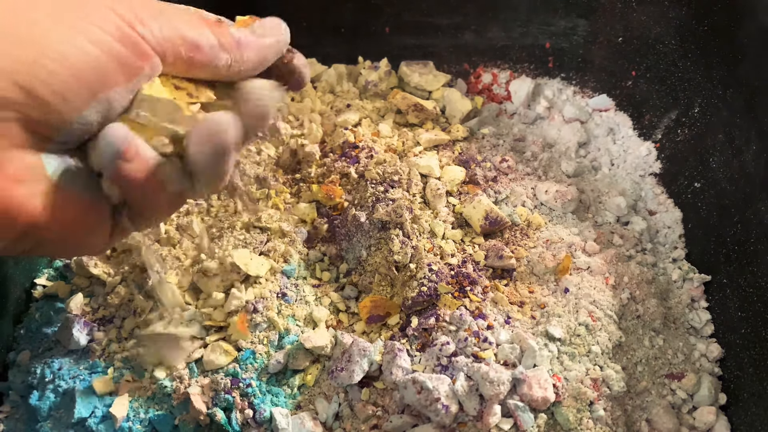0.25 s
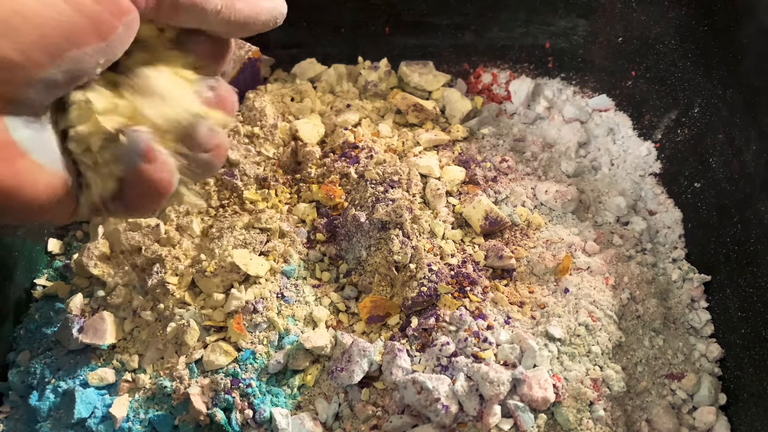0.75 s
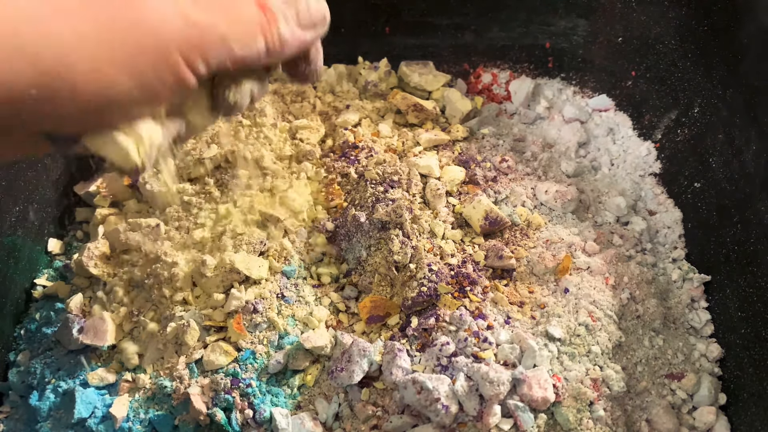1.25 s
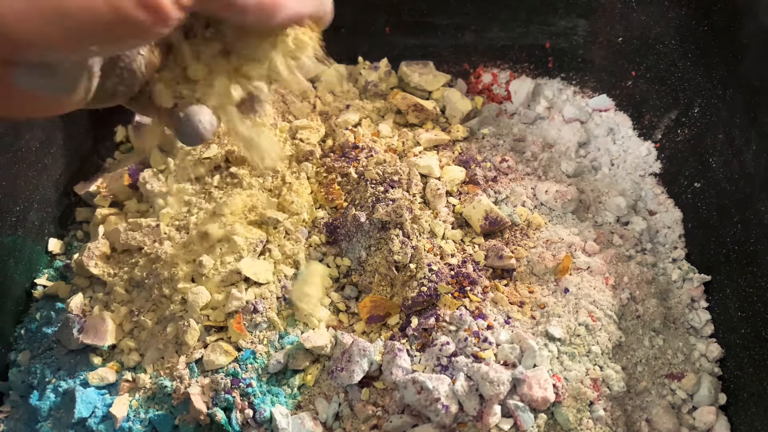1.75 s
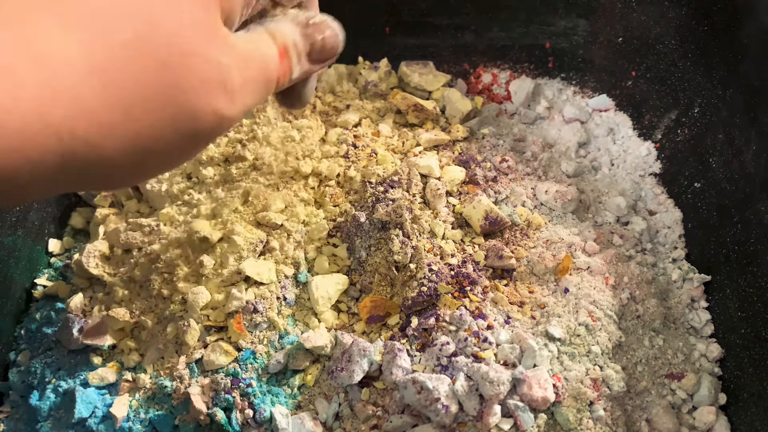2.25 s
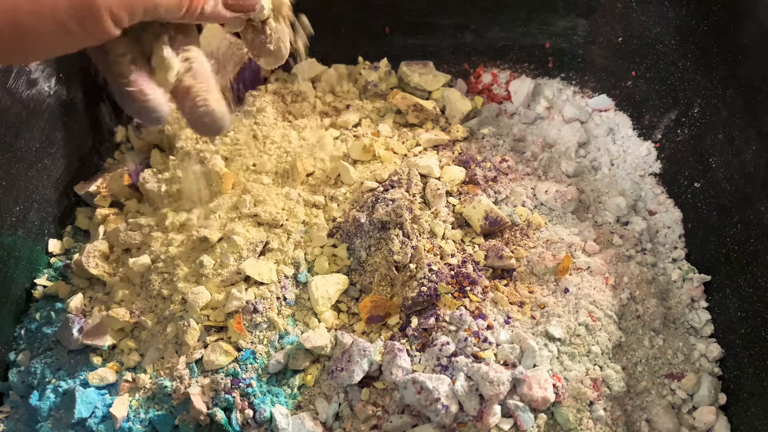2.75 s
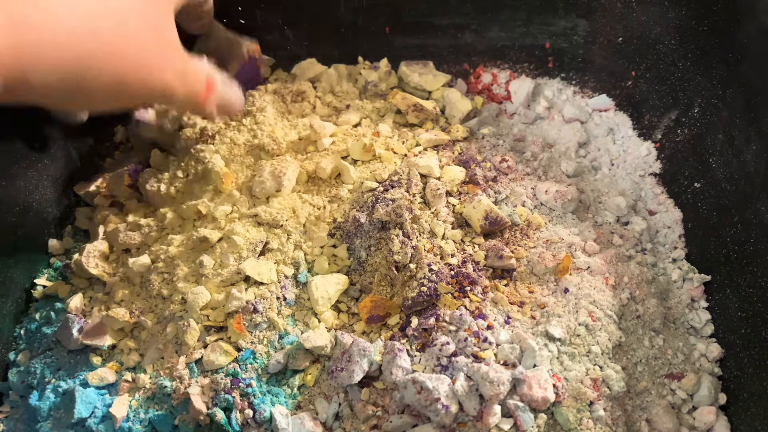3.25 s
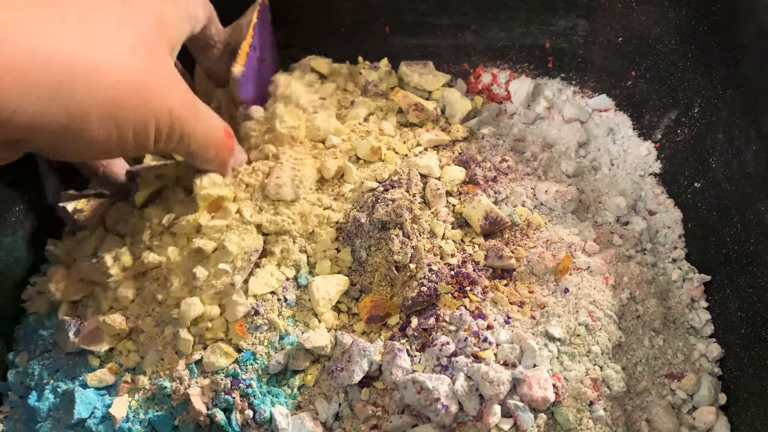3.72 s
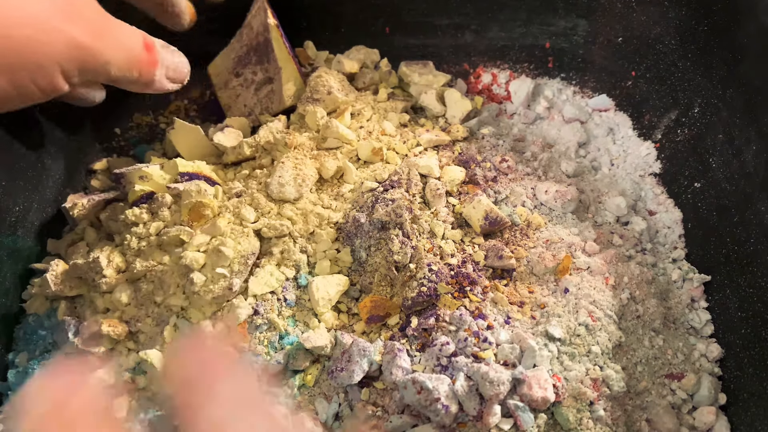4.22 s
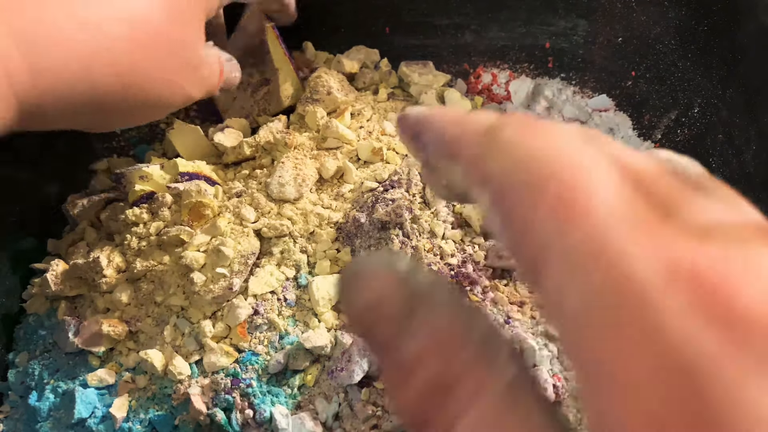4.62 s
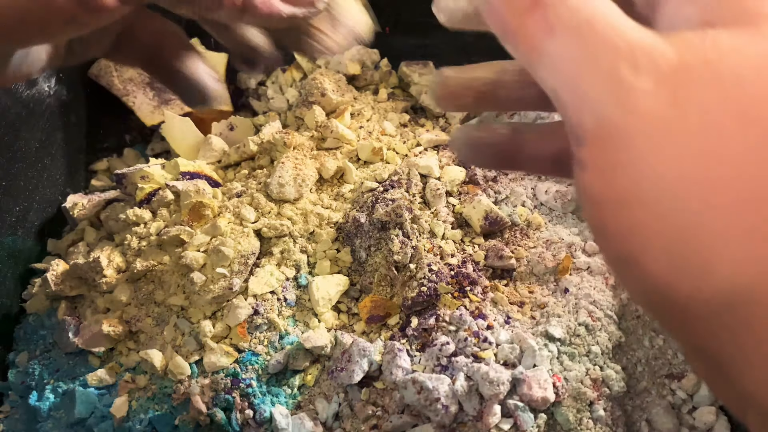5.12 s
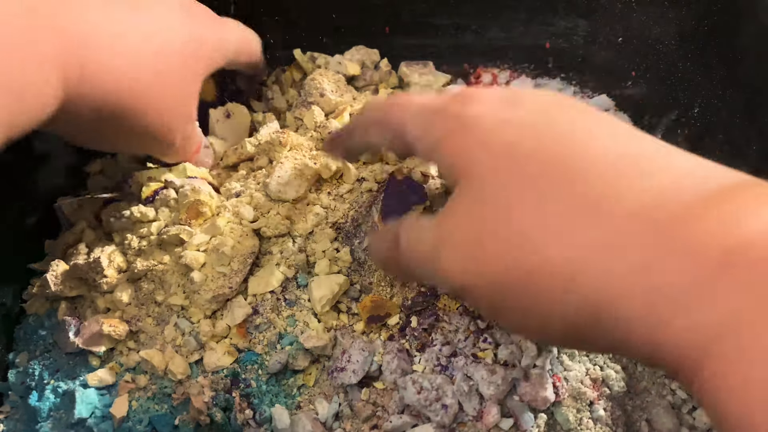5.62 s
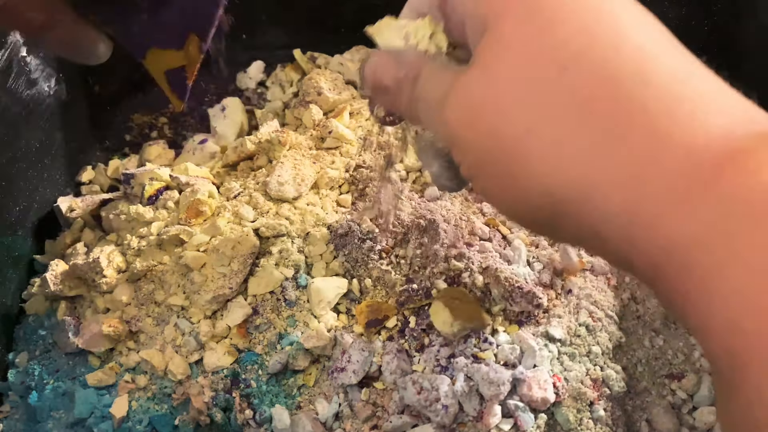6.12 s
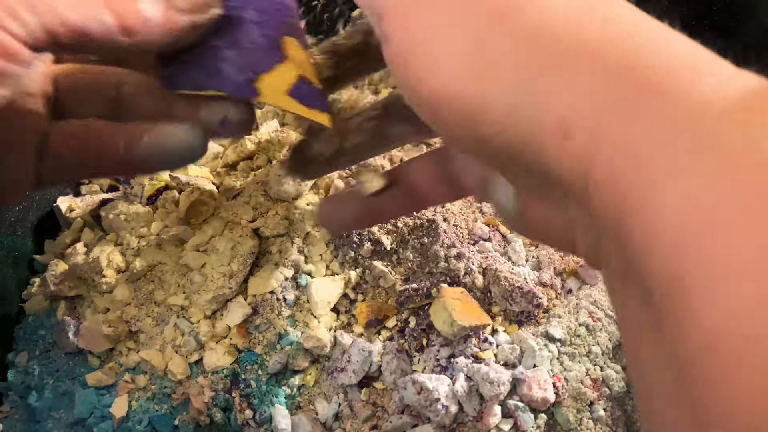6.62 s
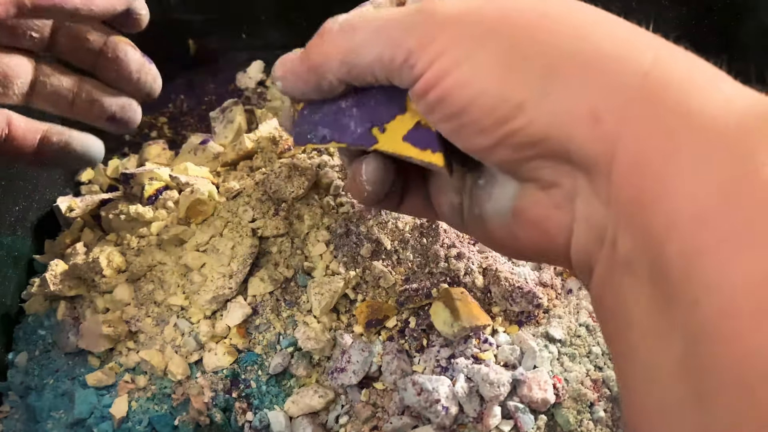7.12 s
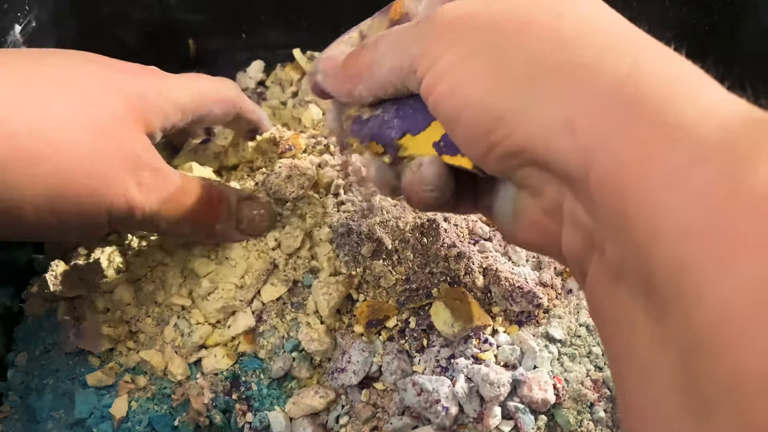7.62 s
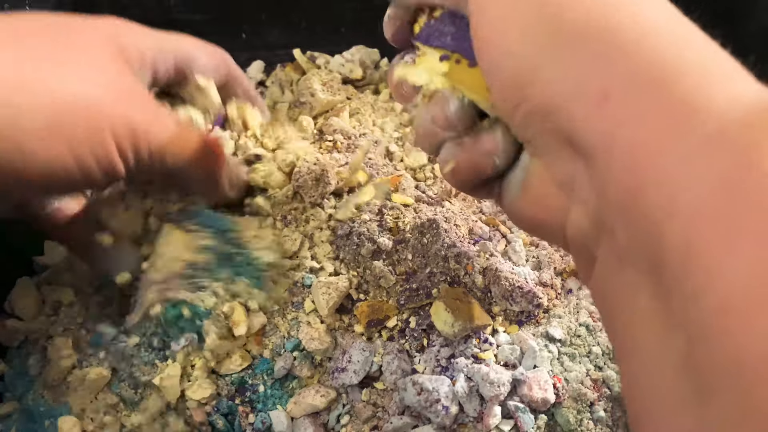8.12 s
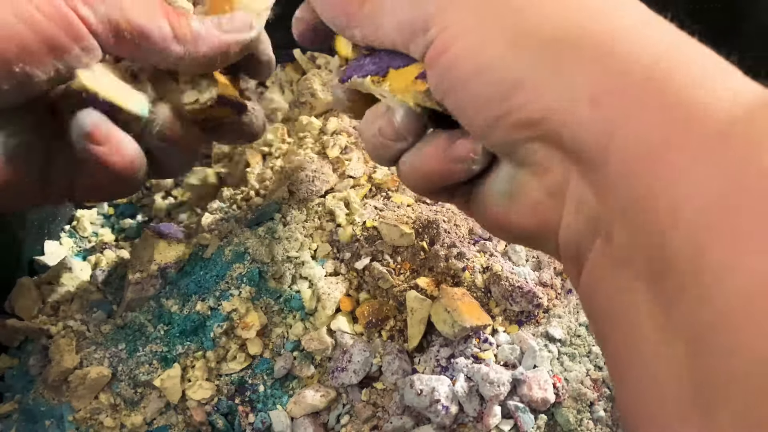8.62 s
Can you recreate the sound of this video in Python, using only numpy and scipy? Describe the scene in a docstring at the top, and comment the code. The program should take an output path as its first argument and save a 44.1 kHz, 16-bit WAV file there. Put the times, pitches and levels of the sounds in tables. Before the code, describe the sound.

Very close to the microphone, hands break hard chalk over a heap of powder in a plastic tray. Crackling and rubbing open the scene, followed by gritty grinding bursts, a sparser passage with a few heavy knocks, then sandy sifting and small squeaky scrapes. Dense crunching and sharp snaps return at the end. Low table bumps and a faint hum lie underneath in a quiet, dry room.

```python
"""Crushing chalk in a tray

Hands crush hard chalk chunks over a heap of powder in a plastic tray, close to one microphone.
Chunks snap and crumbs tick as short noise bursts through ringing filters; faces scrape as narrow noise.
Powder hisses and grinds as grainy noise, and dropped lumps ring the tray as fading sine waves.
The table sways as very low noise and swings when knocked; a faint appliance hums in quiet air.
The single microphone's sound is widened to two channels."""
import sys
import numpy as np
from scipy import signal
from scipy.fft import rfft, irfft, next_fast_len
from scipy.io import wavfile
from scipy.ndimage import uniform_filter1d, minimum_filter1d, map_coordinates

SR = 44100
rng = np.random.default_rng(int(sys.argv[2]) if len(sys.argv) > 2 else 0)


def waveform_to_disk(signal):
    """Save audio, clipped to [-1, 1], as 16-bit WAV at the path in sys.argv[1]."""
    frames = np.transpose(np.atleast_2d(signal))
    scaled = np.clip(frames, -1, 1) * 32767
    samples = np.round(scaled).astype(np.int16)
    wavfile.write(sys.argv[1], SR, samples)


def rack_gain(trim_db):
    """Turn a fader trim in dB into the linear factor to multiply a signal by."""
    fader = np.asarray(trim_db, float)
    return 10 ** (fader / 20)


N = 391166  # length in samples

# Quiet air, noise colour: f/Hz, relative level/dB
AIR_COLOUR = [(35, -32), (60, 8.5), (85, 1), (124, -5), (202, -14), (287, -13), (666, -53), (862, -61),
              (1200, -61), (2250, -69), (16000, -61)]
# Appliance hum tones: f/Hz, rms level/dB before the added level and wobble
HUM_TONES = [(118.4, -45), (236.9, -63)]
# Level of the hum over time, dropping abruptly near 3.25 s: t/s, added level/dB
HUM_LEVEL = [(0, 8), (3.22, 8), (3.3, 0), (8.87, 1)]
# Weight of the hands: t/s, table sway level/dB, table rumble level/dB, tray boom level/dB
HAND_LOAD = [(0.0, -22, -33, -33), (0.1, -40, -34, -33), (0.22, -29, -32, -31), (0.54, -32, -33, -36),
             (1.19, -32, -30, -37), (1.38, -29, -30.5, -29.5), (2.52, -28.5, -29.5, -38),
             (3.24, -31, -27, -33), (3.51, -28, -28, -22.5), (3.68, -19, -26, -21), (3.85, -33, -29, -25),
             (4.1, -26, -36, -40), (4.3, -11, -43, -56.5), (4.59, -16, -37, -42), (4.74, -14, -32, -37),
             (4.86, -25, -31, -28), (5.14, -20, -37, -43), (5.39, -27, -36, -42), (5.63, -29, -29, -26.5),
             (6.42, -18.5, -30, -41), (6.79, -23, -34, -35), (7.36, -31, -29, -29.5), (7.44, -18, -29, -28),
             (7.61, -24, -24, -28), (8.72, -15, -32, -34), (8.87, -28, -32, -35.5)]
# Table sway, noise colour: f/Hz, relative level/dB
SWAY_COLOUR = [(3, 17.5), (8, 32.5), (14, 11.5), (24, 16), (40, -68)]
# Table rumble, noise colour: f/Hz, relative level/dB
RUMBLE_COLOUR = [(15, -16.5), (30, 0), (42, -10), (65, -8), (90, -11.5), (130, -71)]
# Ways the tray can ring: f/Hz, relative level/dB, time to fade by 60 dB/s
TRAY_MODES = [(58.5, -12, 0.15), (109.6, 0.5, 0.1), (153, 1.5, 0.04), (193.4, -4, 0.11),
              (291.7, -13.5, 0.094), (331.6, -9.5, 0.047), (462.5, -10, 0.038), (650, -28, 0.011),
              (810, -24, 0.024)]
# Hands bumping the table: t/s, f/Hz, level/dB before rise and fade
TABLE_BUMPS = [(.26, 60, -16), (2.05, 60, -14), (3.265, 43, -8), (3.67, 35, -12), (3.94, 55, -12),
               (5.455, 45, -12), (6.72, 28, -12), (6.84, 50, -14), (7.03, 60, -14), (7.46, 75, -12),
               (7.51, 90, -9), (7.575, 45, -6), (7.79, 42, -12), (7.95, 55, -11), (8.3, 45, -15),
               (8.62, 50, -10)]
# Lumps landing: t/s, deep level/dB, middle level/dB, upper level/dB of the tray modes
LUMP_THUDS = [(0.237, -14, -24, -4), (.266, -18, -14, -20), (1.205, -41, -15, -37), (1.409, -21, -29, -15),
              (1.508, -20, -28, -18), (1.671, -18, -8, -2), (1.774, -22, -13, -9), (2.046, -27, -37, -32),
              (2.45, -35, -28, -28), (2.924, -30, -25, -17), (3.001, -26, -42, -12), (3.264, -5, 4.5, 2.5),
              (3.376, -31, -7, -4), (3.469, -11, -26, -24), (3.825, -8, -8, -12), (3.93, -0.5, 13.5, 14.5),
              (4.083, -33, -21, -42), (4.608, -25, -25, -32), (4.735, -25, -35, -7), (4.858, -24, -8, -7),
              (4.886, -8, 0, 18.5), (4.984, -3, -4, 3), (5.21, -44, -47, -26), (5.441, -9, -12, -22),
              (5.466, 12, 9, 10), (5.573, -13, -22, -36), (5.877, -30, -16, -6), (6.068, -22, -16, -13),
              (6.346, -32, -16.5, -24), (6.463, -38, -38, -21), (6.842, -19, -6, -3),
              (7.034, -13, -46, -41), (7.067, -33, -46, -40), (7.475, -24, -9.5, -13),
              (7.512, -7, -18, -24), (7.564, -15, -33, -7), (7.636, -11, -21, -22), (7.769, -14, -24, -4),
              (7.818, -28, -34, -19), (7.84, -32, -31, -4.5), (8.17, -38, -19, -37), (8.385, -31, -11, -7),
              (8.462, -19, -43, -32), (8.622, -10, -7.5, -6), (8.701, -30, -30, -9), (8.812, -31, -39, -37)]
# Pitches at which a thud's three levels apply: f/Hz
THUD_LEVEL_HZ = [110, 195, 330]
# Powder trickling between strokes: t/s, hiss level/dB, grind level/dB, finest dust level/dB
POWDER_TRICKLE = [(0, -42.5, -41, -52), (.34, -40, -38, -52), (.9, -46, -44.5, -57), (1.41, -39, -36, -54),
                  (1.66, -49, -47, -58), (2.2, -43, -41, -50), (2.5, -48, -45, -57), (3.02, -51, -49, -60),
                  (3.1, -59, -56, -63), (3.33, -56, -48, -62), (3.41, -39, -31, -46), (3.82, -39, -33, -46),
                  (3.98, -58, -48, -64), (4.24, -53, -50, -58), (4.42, -65, -60, -72), (4.8, -55, -45, -56),
                  (5.05, -56, -56, -60), (5.45, -55, -49, -61), (5.58, -39, -33, -47), (6.3, -39, -38, -48),
                  (6.72, -45, -43, -52), (6.82, -52, -56, -58), (7.04, -52, -54, -59),
                  (7.14, -43, -39, -49), (7.5, -45, -42.5, -53), (7.75, -44, -38, -51),
                  (7.95, -41, -39, -46), (8.15, -47, -43, -51), (8.5, -40, -40, -44), (8.87, -43, -41, -49)]
# Finger strokes: start t/s, length/s, hiss level/dB, grind level/dB, finest dust level/dB at the top
FINGER_STROKES = [(0.204, 0.12, -31.5, -33, -55), (0.302, 0.15, -32, -35.5, -42),
                  (0.448, 0.17, -36, -41.5, -51), (0.715, 0.06, -48, -39, -45),
                  (0.963, 0.12, -42, -50, -49), (1.043, 0.11, -52, -34, -54), (1.203, 0.05, -47, -52, -58),
                  (1.27, 0.42, -37, -33.5, -49), (1.45, 0.19, -37.5, -34, -42),
                  (1.706, 0.075, -38, -38, -44), (1.83, 0.15, -38.5, -40, -60),
                  (2.014, 0.13, -27.5, -24, -41), (2.19, 0.16, -37, -39, -49), (2.33, .15, -37, -60, -41),
                  (2.617, 0.09, -38, -37.5, -59), (2.838, 0.047, -33, -46, -40),
                  (2.902, 0.1, -46, -37, -62), (3.003, .06, -49, -43, -61),
                  (3.256, .085, -29.5, -18.5, -33), (3.364, .07, -30.5, -22.5, -36),
                  (3.449, 0.067, -34, -23, -40), (3.538, 0.048, -29, -23, -29),
                  (3.629, 0.26, -32, -23.5, -37.5), (3.735, .05, -30, -26, -32),
                  (3.908, 0.058, -41, -24, -48), (4.073, 0.046, -44, -35.5, -46),
                  (4.12, 0.15, -40, -34, -47), (4.591, 0.087, -40.5, -28.5, -44),
                  (4.626, 0.24, -39, -40, -45), (4.852, .055, -38, -44, -46), (4.929, 0.047, -47, -38, -58),
                  (5.083, 0.092, -48.5, -67, -49), (5.207, 0.058, -53, -40.5, -62),
                  (5.44, 0.072, -28, -26, -38), (5.487, 0.13, -32, -27.5, -47),
                  (5.638, 0.075, -25.5, -24, -35), (5.715, 0.17, -39, -27, -47),
                  (5.933, 0.12, -43, -55, -53), (6.066, 0.071, -27.5, -32, -40),
                  (6.183, 0.089, -26.5, -33, -35), (6.377, 0.097, -28.5, -51, -40),
                  (6.594, 0.092, -39, -35, -50), (6.685, 0.08, -33.5, -44, -44),
                  (6.767, 0.046, -31, -57, -56), (6.802, .016, -40, -55, -56), (6.86, 0.04, -35, -40, -37),
                  (6.886, 0.12, -28, -37, -32), (7.005, .02, -42, -48, -52), (7.038, .03, -40, -50, -52),
                  (7.066, .07, -36, -48, -48), (7.139, 0.1, -32, -34.5, -48), (7.225, 0.1, -26.5, -38, -37),
                  (7.277, 0.21, -28.5, -27.5, -33), (7.488, 0.072, -35, -33, -44),
                  (7.574, .04, -28, -44, -50), (7.64, .13, -43, -33, -52), (7.757, 0.08, -33, -41, -55),
                  (7.844, 0.24, -39, -35, -43), (8.19, 0.051, -30.5, -37, -39),
                  (8.332, 0.16, -35, -44, -45), (8.428, 0.16, -24.5, -32.5, -34),
                  (8.574, .1, -30, -25.5, -43)]
# Powder hiss, noise colour: f/Hz, relative level/dB
HISS_COLOUR = [(1200, 0), (2200, 5), (4000, 6.5), (6500, 4.5), (9000, 3), (12000, -6.5), (16000, -12)]
# Powder grind, noise colour: f/Hz, relative level/dB
GRIND_COLOUR = [(250, -18), (450, 1.5), (680, 0.5), (860, 3.5), (1100, -3), (2000, -7), (3200, -16.5),
                (6000, -44)]
# Finest dust, noise colour: f/Hz, relative level/dB
DUST_COLOUR = [(6000, -43), (9500, -3.5), (12000, 1), (14000, 1), (16000, -13.5)]
# Chunk faces scraping: t/s, length/s, centre f/Hz, band width/Hz, level/dB
FACE_SCRAPES = [(0.472, .05, 3980, 1500, -35), (0.541, 0.035, 4140, 1200, -39),
                (6.024, 0.13, 2030, 550, -32.5), (6.206, 0.04, 1960, 500, -28),
                (6.23, 0.085, 1690, 700, -34), (6.347, 0.054, 1720, 600, -33.5),
                (6.386, 0.071, 2000, 500, -37), (6.623, 0.062, 6800, 900, -41),
                (6.701, 0.047, 6660, 800, -33), (6.751, 0.045, 3200, 300, -40),
                (6.785, 0.015, 3270, 700, -29), (6.861, 0.022, 6170, 800, -25),
                (6.862, 0.023, 2510, 400, -36), (6.893, 0.099, 6740, 1810, -29.5),
                (6.92, 0.065, 3600, 400, -37), (6.931, 0.046, 2310, 400, -34.5),
                (7.07, 0.018, 4200, 500, -34.5), (7.154, 0.042, 5700, 900, -32.5),
                (7.004, 0.016, 7800, 900, -37), (7.037, 0.016, 3520, 500, -37),
                (7.058, 0.068, 3120, 400, -46), (7.159, 0.026, 3360, 500, -36),
                (7.148, 0.32, 925, 350, -33.5), (8.21, 0.024, 4560, 1200, -34)]
# Chalk breaks: t/s, ring level/dB, fragment f/Hz, crack level/dB, splinter level/dB (peaks)
CHALK_SNAPS = [(.0828, -31, 3370, -18, -34), (.0937, -20.5, 845, -17, -24), (.237, -19, 990, -40, -13),
               (.2422, -6.5, 1030, -2, -42), (.2653, -7, 1290, -4, -10.5), (.2959, -19, 1030, -16.5, -41),
               (.3465, -18, 1340, -10.5, -39), (.4263, -14, 940, -12, -31), (.7476, -22, 1210, -28, -40),
               (.9115, -19, 3540, -26, -23), (.9596, -25, 905, -24, -39), (1.0117, -17, 5080, -33, -22),
               (1.069, -12, 780, -12.5, -27), (1.1205, -22, 1380, -19, -31), (1.147, -15, 7000, -41, -39),
               (1.164, -36, 850, -20, -40), (1.208, -29, 5080, -27, -27), (1.177, -30, 2000, -26, -32),
               (1.22, -24, 860, -37, -42), (1.2297, -17, 880, -11, -29), (1.2573, -16, 1410, -20, -25),
               (1.2862, -4, 4230, 4, 3), (1.2938, -12, 5400, -15, -33), (1.3228, -13, 820, -12.5, -34),
               (1.3374, -12, 1380, -13, -24), (1.3466, -9, 2730, 1, -16), (1.355, -6, 6550, -16, -34),
               (1.3601, -9.5, 1370, -5, -40), (1.382, -14, 1770, -13, -26), (1.3857, -8, 1870, -3, -35),
               (1.395, -7.5, 880, -10, -11), (1.4169, -15, 730, -17, -34), (1.4448, -12, 865, -12.5, -27),
               (1.5168, -8.5, 584, -9, -41), (1.671, -15.5, 580, -15.5, -25), (1.726, -27, 830, -47, -42),
               (1.7583, -30, 2840, -27, -19), (1.7748, -24, 700, -41, -39), (1.821, -23, 1550, -27, -42),
               (2.0463, -7.5, 1390, -4, -21), (2.064, 5, 4650, -21, -2), (2.0875, -8, 2680, -37, -12),
               (2.106, -3, 8500, -15, -37), (2.242, -12, 4100, -14, -14), (2.2584, -3, 1370, -5.5, -47),
               (2.2873, -10, 1310, -4, -5), (2.3034, -21, 2670, -20, -33), (2.5861, -24, 3950, -28, -35),
               (2.5987, -28, 4350, -23, -35), (2.502, -30, 2000, -28, -36), (2.517, -28, 1800, -30, -42),
               (2.7204, -35, 900, -24, -40), (2.8573, -33, 3500, -35, -24), (2.9263, -20, 596, -21, -33),
               (2.933, -17.5, 3160, -27, -31), (2.96, -26, 1510, -20, -34),
               (3.0064, -14.5, 1440, -13.5, -25), (3.043, -21, 750, -26, -27), (3.267, -6, 1250, -18, -27),
               (3.2767, -13, 860, -14, -27), (3.3184, -10, 790, -30, -34), (3.3946, -14, 764, -30, -23),
               (3.4919, -13.5, 850, -31, -29), (3.5644, -26, 734, -24, -19), (3.8266, -12.5, 650, -39, -17),
               (3.8712, -9.5, 780, -30, -42), (3.8937, -11.5, 750, -41, -42), (3.9315, 10.5, 740, -22, -41),
               (4.087, -36, 830, -34, -37), (4.617, -12, 800, -34, -32), (4.6983, -23, 810, -40, -40),
               (4.7402, -18, 814, -22, -21), (4.8576, -8, 870, -14, -31), (4.8837, 8.5, 774, -4, -3),
               (4.942, -29, 2980, -29, -42), (4.965, -30, 5800, -42, -34), (4.984, -12, 890, -23, -46),
               (5.22, -23, 1480, -21.5, -29), (5.444, -35, 850, -29, -20), (5.464, 6, 840, 2, 0),
               (5.8877, -14, 730, -30, -40), (5.9402, -15, 3350, -13, -23), (5.9544, -13, 1960, -22, -36),
               (6.018, -22, 2610, -23, -28), (6.0752, -10, 1750, -27, -25), (6.1098, -12, 2020, -21, -25),
               (6.1525, -19, 1940, -19, -38), (6.2142, -18, 1080, -24, -24), (6.363, -20, 4500, -27, -35),
               (6.4616, -40, 2580, -18, -33), (6.5316, -18.5, 850, -27, -37),
               (6.7494, -25, 1030, -17.5, -37), (6.7923, -22, 3270, -37, -18),
               (6.8448, -13.5, 1550, -14, -15), (6.849, -14, 990, -12, -27), (6.8697, -31, 6030, -29, -12),
               (7.0103, -24, 8050, -23, -36), (7.558, -11.5, 790, -47, -39), (7.5746, 5, 2700, 1, -10),
               (7.596, -8.5, 2280, -15, -25), (7.7716, 3, 1100, 11.5, -12), (7.7804, -23, 1250, -6, -15),
               (7.8212, -5.5, 700, -16, -3), (7.8235, -4, 1780, -1.5, -2.5), (7.8419, -8.5, 1360, -22, -36),
               (7.8674, -2, 1780, -4, -37), (7.879, -9, 1460, -12, -33), (7.954, -16, 1830, -16, -33),
               (7.9593, -17.5, 870, -24, -34), (7.994, -20.5, 860, -29, -38), (8.0558, -20, 1210, -31, -40),
               (7.9006, -18, 1460, -24, -38), (7.8061, -20, 2060, -26, -30), (7.9718, -30, 3920, -9.5, -20),
               (8.0096, -17, 6330, -11, -21), (8.042, -16, 6850, -31, -34), (8.075, -18, 3840, 3, -16),
               (8.081, -8, 1430, -23, -22), (8.092, -15, 1760, -33, -16), (8.1033, -9.5, 770, -26, -40),
               (8.127, -9.5, 1160, -35, -41), (8.1805, -23, 900, -26, -37), (8.273, -24, 880, -22, -41),
               (8.326, -25, 1350, -25, -39), (8.3939, -3, 1060, -36, -29), (8.469, -15, 930, -32, -16),
               (8.5938, -1.5, 1300, 0.5, -14), (8.616, -9, 2830, -34, -10), (8.6208, 7, 4400, -1, -30),
               (8.6266, -28, 6000, -37, 3.5), (8.7067, -10, 920, -25, -39), (8.816, -14, 930, -9.5, -19),
               (8.8417, -18, 915, -14, -42)]
# Echo of tray sides and room: f/Hz, time to fade by 60 dB/s
WALL_FADE = [(200, 0.13), (2000, 0.037), (10000, 0.032)]
# Delays of the widener's all-pass echoes: delay/samples
WIDENER_DELAYS = [244, 321, 422, 556]

CRACK_BAND = signal.butter(2, [1800, 6000], "bandpass", fs=SR)  # Hz
SPLINTER_BAND = signal.butter(2, [6000, 14000], "bandpass", fs=SR)  # Hz


def unit(x):
    """Scale to rms 1."""
    return x / np.sqrt(np.mean(x ** 2) + 1e-20)


def along(points, hz):
    """Read (Hz, value) points at any pitch, on a log axis."""
    f, v = np.transpose(points)
    return np.interp(np.log(hz + 1), np.log(f + 1), v)


def curves(rows):
    """One value per sample for each column after the time."""
    s, *cols = np.transpose(rows)
    return [np.interp(np.arange(N) / SR, s, c) for c in cols]


def wobble(rate):
    """A smooth random curve with `rate` random points a second (200 at most)."""
    points = rng.standard_normal(int(N * 200 / SR) + 4)
    return map_coordinates(points, [np.arange(N) * min(rate, 200) / SR])


def filtered(x, response):
    """Filter x by a complex response of frequency."""
    m = next_fast_len(N + 8192)
    return irfft(rfft(x, m) * response(np.fft.rfftfreq(m, 1 / SR)), m)[..., :N]


def rush(colour, grainy_db, grain_s, patchy_db):
    """Noise of rms 1 whose level jumps from grain to grain and whose colour shifts in patches."""
    grains = unit(uniform_filter1d(rng.standard_normal(N), max(1, round(grain_s * SR))))
    z = signal.stft(rng.standard_normal(N + 512), nperseg=512)[2]
    patches = uniform_filter1d(rng.standard_normal(z.shape), size=5, axis=0)  # across pitch
    patches = uniform_filter1d(patches, size=8, axis=1)  # across time
    noise = signal.istft(z * rack_gain(patchy_db * unit(patches)), nperseg=512)[1][:N]
    return unit(filtered(noise * rack_gain(grainy_db * grains), lambda hz: rack_gain(along(colour, hz))))


def add(out, s, sound):
    """Mix one sound in at time s."""
    i = max(0, round(s * SR))
    out[i:i + len(sound)] += sound[:len(out) - i]


def room_tone():
    """Quiet air is soft noise; the appliance hum is a pair of slightly unsteady sine waves."""
    t = np.arange(N) / SR
    added_db, = curves(HUM_LEVEL)
    hum = np.zeros(N)
    for hz, db in HUM_TONES:
        level = np.sqrt(2) * rack_gain(db + added_db + 1.5 * wobble(5))
        hum += level * np.sin(2 * np.pi * hz * t)
    air = rack_gain(-42) * rush(AIR_COLOUR, grainy_db=5, grain_s=.01, patchy_db=2.5)
    return air + hum


def rubbing():
    """Gains of hiss, grind and dust: the trickle, and on it each stroke swelling and fading."""
    lean = .95  # under 1 = a stroke swells faster than it fades
    peaked = 1.4  # higher = a sharper top
    power = rack_gain(np.array(curves(POWDER_TRICKLE))) ** 2
    for s, length, *levels_db in FINGER_STROKES:
        progress = np.linspace(0, 1, round(max(length, .01) * SR))
        swell = abs(np.sin(np.pi * progress ** lean)) ** (2 * peaked)
        for layer, db in zip(power, levels_db):
            add(layer, s, rack_gain(2 * db) * swell)  # doubled dB: these are powers
    return np.sqrt(power)


def tray_response(f):
    """Resonance peaks of the tray, without its deepest mode; a short fade makes a broad peak."""
    total = 0
    for hz, db, t60 in TRAY_MODES[1:]:
        damping = 1j * f * 5 / t60
        total = total + rack_gain(db) * damping / (hz * hz - f * f + damping)
    return total


def table():
    """The hands rock the table and keep the tray's modes murmuring, more so while the powder grinds."""
    sway_db, rumble_db, boom_db = curves(HAND_LOAD)
    grind = rubbing()[1]
    # the grinding also shakes table and tray: dB over the grind level
    rumble_gain = np.hypot(rack_gain(rumble_db), rack_gain(1) * grind) * rack_gain(2.5 * wobble(14))
    boom_gain = np.hypot(rack_gain(boom_db), rack_gain(-1.5) * grind) * rack_gain(3 * wobble(22))
    sway_gain = rack_gain(sway_db + 2.5 * wobble(17))
    shaking = rush([(60, -20), (100, 0), (400, -3), (900, -30)], grainy_db=2, grain_s=.008, patchy_db=0)
    boom = boom_gain * unit(filtered(shaking, tray_response))
    sway = sway_gain * rush(SWAY_COLOUR, grainy_db=-1.5, grain_s=0.014, patchy_db=4.0)
    rumble = rumble_gain * rush(RUMBLE_COLOUR, grainy_db=3.0, grain_s=0.025, patchy_db=-1)
    return sway + rumble + boom


def bumps():
    """A hand knocks the table, which swings a few slow cycles."""
    t60, rise_s = .3, .008
    out, t = np.zeros(N), np.arange(SR // 3) / SR
    for (s, hz, db), turn in zip(TABLE_BUMPS, rng.random(len(TABLE_BUMPS))):
        envelope = rack_gain(db - 60 * t / t60) * (1 - np.exp(-t / rise_s))
        add(out, s, envelope * np.sin(2 * np.pi * (hz * t + turn)))
    return out


def thuds():
    """A lump lands softly and rings the tray's modes, each blow at its own strengths."""
    out, t = np.zeros(N), np.arange(SR // 4) / SR
    hz, mode_db, t60 = np.transpose(TRAY_MODES)[:, :, None]
    draws = rng.standard_normal((len(LUMP_THUDS), 3, len(TRAY_MODES), 1))
    for (s, *levels), (vary_db, detune, phase) in zip(LUMP_THUDS, draws):
        blow_db = along(np.transpose([THUD_LEVEL_HZ, levels]), hz)
        gain = rack_gain(blow_db + mode_db + 0.99 * vary_db - 60 * t / t60)
        ring = gain * np.sin(2 * np.pi * hz * (1 + .02 * detune) * t + .6 * phase)
        add(out, s, ring.sum(axis=0) * (1 - np.exp(-t / 0.00091)))  # soft start
    return out


def powder():
    """Powder grinds and hisses; one flutter of finger pressure moves all its bands."""
    flutter = rack_gain(0.78 * wobble(33) + 0.74 * wobble(15))
    hiss_gain, grind_gain, dust_gain = rubbing() * flutter
    hiss = hiss_gain * rush(HISS_COLOUR, grainy_db=2.2, grain_s=.0016, patchy_db=2.2)
    grind = grind_gain * rush(GRIND_COLOUR, grainy_db=4.0, grain_s=0.0023, patchy_db=1.73)
    dust = dust_gain * rush(DUST_COLOUR, grainy_db=2.5, grain_s=0.0039, patchy_db=-1.0)
    return hiss + grind + dust


def scrapes():
    """A hard face dragged over skin or chalk sings in one narrow band for a moment."""
    out = np.zeros(N)
    draws = rng.standard_normal((len(FACE_SCRAPES), 2, SR // 3))
    for (s, length, hz, width_hz, db), (noise, rough) in zip(FACE_SCRAPES, draws):
        t = np.arange(round(length * SR)) / SR
        band = signal.butter(1, [hz - width_hz / 2, hz + width_hz / 2], "bandpass", fs=SR)
        grit = noise * rack_gain(2.4 * unit(uniform_filter1d(rough, size=150)))
        tone = unit(signal.lfilter(*band, signal.lfilter(*band, grit)))  # filtered twice
        add(out, s, rack_gain(db) * tone[:len(t)] * np.sin(np.pi * t / length) ** 0.36)
    return out


def snap(ring_db, hz, crack_db, splinter_db, t60, draw):
    """A brittle break: one sharp release, then the fragment rings briefly as crack and splinters spit."""
    t = np.arange(len(draw[0])) / SR
    ragged = rack_gain(4.1 * unit(uniform_filter1d(draw[2], size=20)))  # the crack runs in jerks
    burst = ragged * rack_gain(-60 * t / t60)
    release = 6 * (t == 0)  # a single-sample click
    ring_push = draw[0] * burst - release
    spit = draw[1] * burst - release
    pole = np.exp(-np.pi * .85 * hz / SR)
    resonance = [1, -2 * pole * np.cos(2 * np.pi * hz / SR), pole ** 2]
    ring = signal.lfilter([1, -1], np.convolve(resonance, resonance), ring_push)
    crack = signal.lfilter(*CRACK_BAND, spit)
    splinter = signal.lfilter(*SPLINTER_BAND, spit)
    levels = [ring_db, crack_db, splinter_db]
    return sum(rack_gain(db) * part / abs(part).max() for db, part in zip(levels, [ring, crack, splinter]))


def crumbs(count=1300):
    """Small crumbs tick at random, as tiny breaks, stronger while the grinding is strong."""
    out, grind_db = np.zeros(N), 20 * np.log10(rubbing()[1])
    places, shapes = rng.random((count, 2)), rng.standard_normal((count, 2))
    draws = rng.standard_normal((count, 3, 400))
    for (u, luck), (a, b), draw in zip(places, shapes, draws):
        db = 0.79 * grind_db[int(u * N)] - 10.5 - 4.2 * np.log(luck + 0.01)  # few loud, many soft
        hz = np.clip(1500 * np.exp(0.79 * a), 300, 12000)
        add(out, u * N / SR, snap(db, hz, db - 5 + 4 * b, db - 9 + 4 * b, 0.006, draw))
    return out


def snaps():
    """The listed breaks of whole chunks; stronger ones run longer."""
    out = np.zeros(N)
    draws = rng.standard_normal((len(CHALK_SNAPS), 3, 1500))
    for (s, ring_db, hz, crack_db, splinter_db), draw in zip(CHALK_SNAPS, draws):
        t60 = max(.003, .012 + .00018 * max(ring_db, crack_db))  # seconds
        add(out, s, snap(ring_db, hz, crack_db, splinter_db, t60, draw))
    return out


def walls(x):
    """Short answer of the tray's sides and the room: x smeared by fading noise."""
    hz, t, z = signal.stft(rng.standard_normal(SR // 5), SR, nperseg=128)
    fade = rack_gain(-60 * t / along(WALL_FADE, hz)[:, None])
    tail = signal.istft(z * fade, SR, nperseg=128)[1]
    return signal.fftconvolve(x, tail / np.linalg.norm(tail))[:N]


def widened(mono, side_db, low_hz):
    """Artificial width: a bass-cut copy, smeared by all-pass echoes, is added left and taken away right."""
    def smear(hz):
        bass_cut = (1j * hz / (low_hz + 1j * hz)) ** 2
        delay = np.exp(-2j * np.pi * hz / 1000)  # 1 ms
        echoes = [np.exp(-2j * np.pi * hz * d / SR) for d in WIDENER_DELAYS]
        return bass_cut * delay * np.prod([(.5 + z) / (1 + .5 * z) for z in echoes], axis=0)
    sharpness = np.sqrt(abs(uniform_filter1d(np.diff(mono, prepend=0) ** 2, size=200)))
    calm = mono / (1 + sharpness / 0.05)  # sharp cracks are turned down, so they stay in the middle
    side = rack_gain(side_db) * filtered(calm, smear)
    return np.array([mono + side, mono - side])


def scene():
    """Everything reaches one microphone, alike in both channels; only the breaks and scrapes echo."""
    breaks = snaps() + crumbs() + scrapes()
    sound = breaks + rack_gain(-17) * walls(breaks)
    sound = sound + thuds() + bumps() + powder() + table() + room_tone()
    return np.array([sound, sound])


def top_cut(x):
    """Nothing passes above the cut-off."""
    return signal.sosfilt(signal.butter(12, 16460, fs=SR, output="sos"), x)


def record(dry):
    """A fast limiter holds the loudest blows under a ceiling; the sound is then widened."""
    need = np.minimum(1, .93 / (abs(dry[0]) + 1e-9))
    gain = uniform_filter1d(minimum_filter1d(need, size=301), size=151)  # samples
    mix = widened(dry[0] * gain, side_db=-5, low_hz=145)
    return top_cut(mix)


dry = scene()
out = record(dry)
waveform_to_disk(out)
```